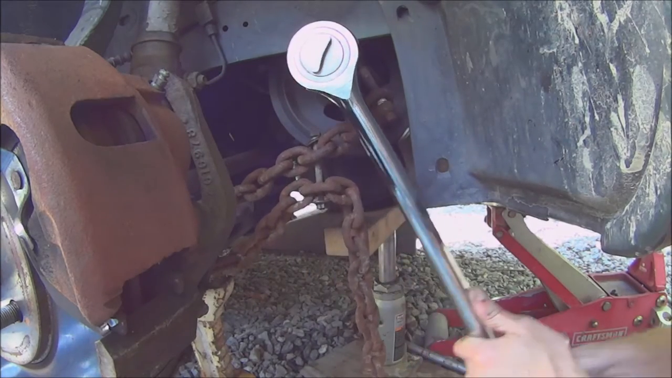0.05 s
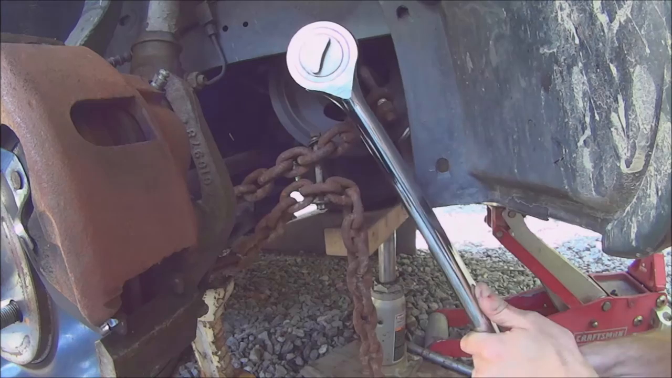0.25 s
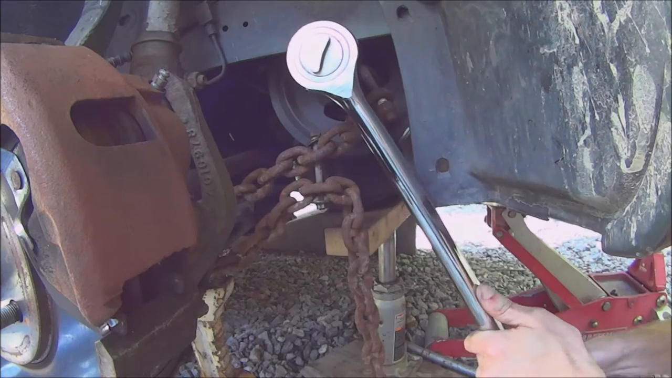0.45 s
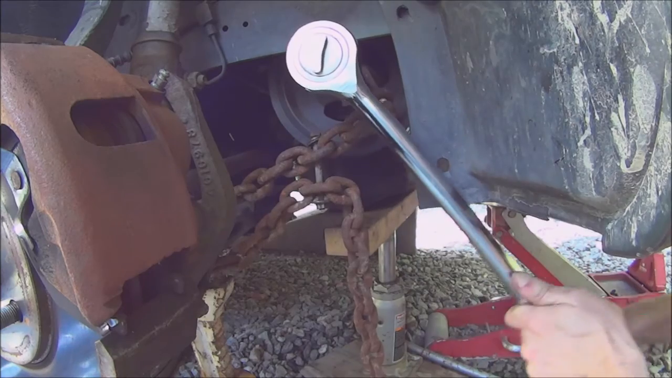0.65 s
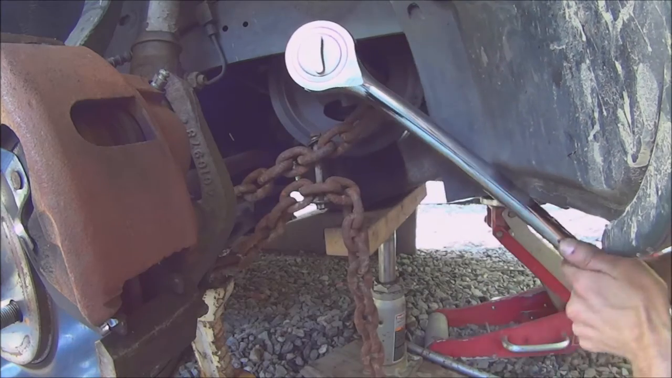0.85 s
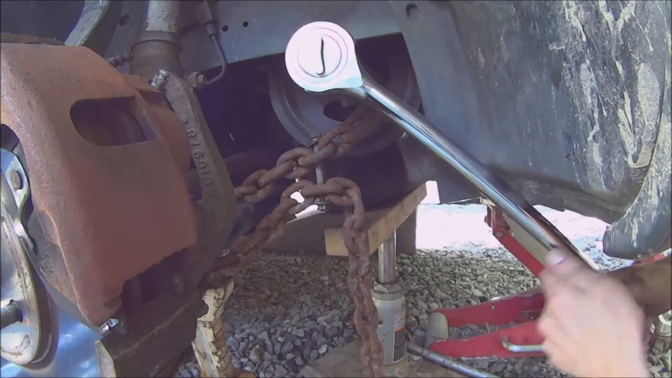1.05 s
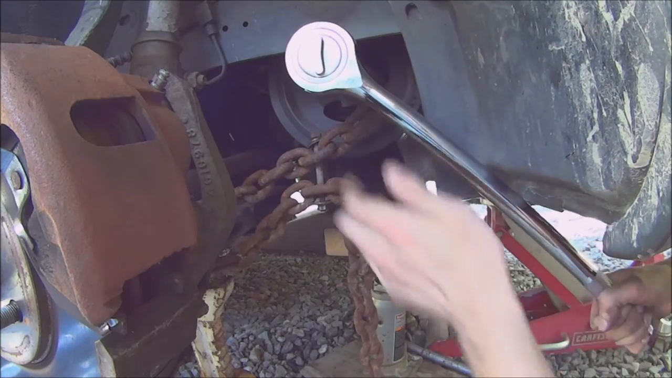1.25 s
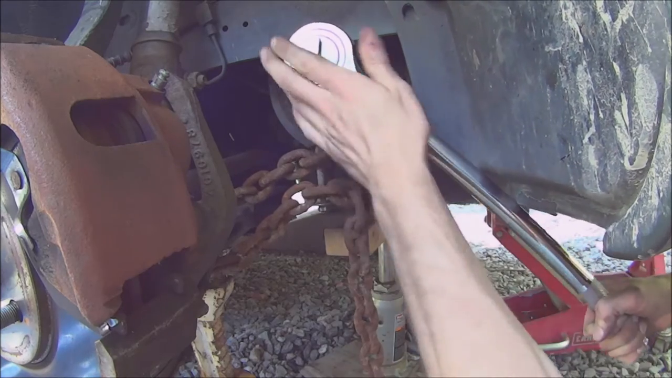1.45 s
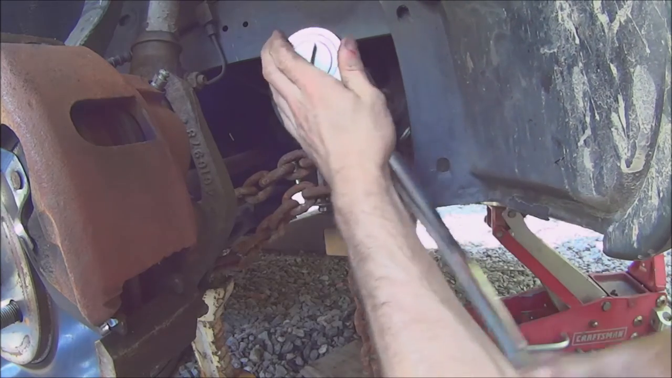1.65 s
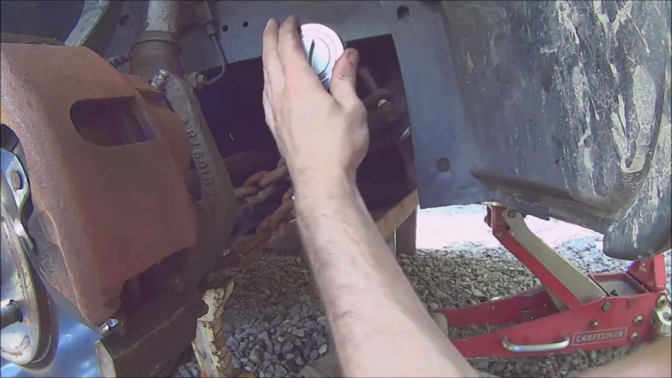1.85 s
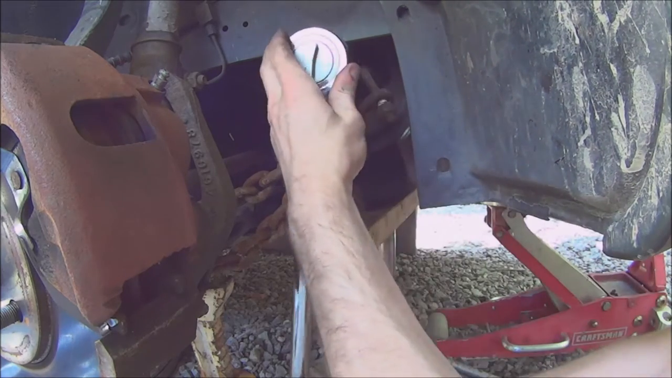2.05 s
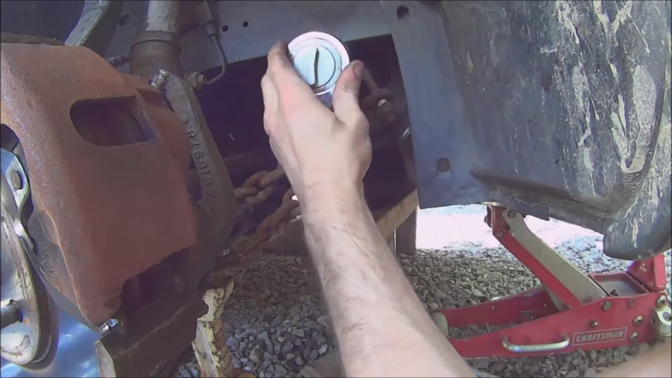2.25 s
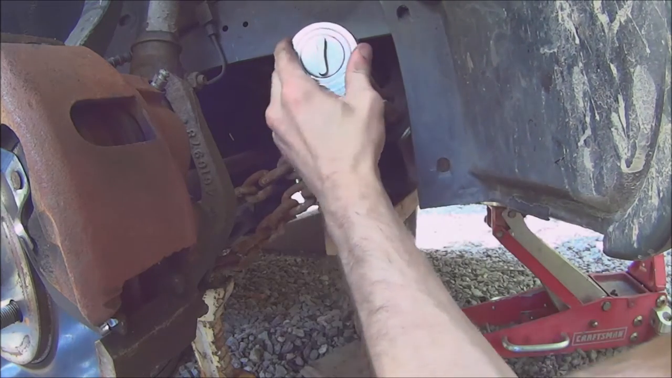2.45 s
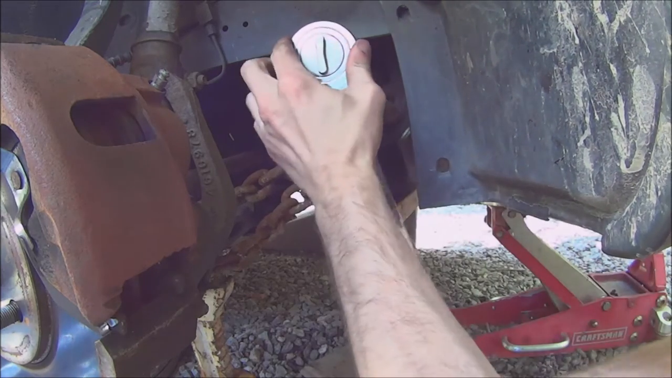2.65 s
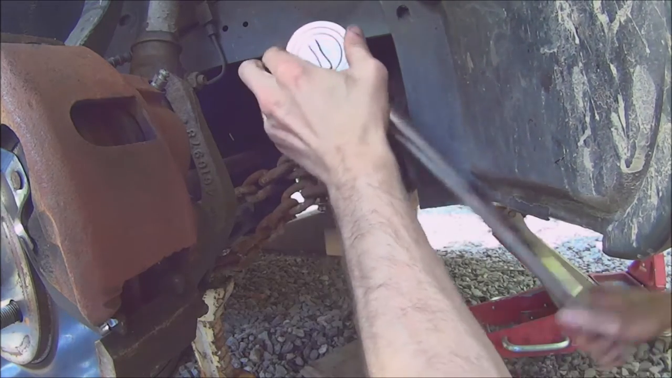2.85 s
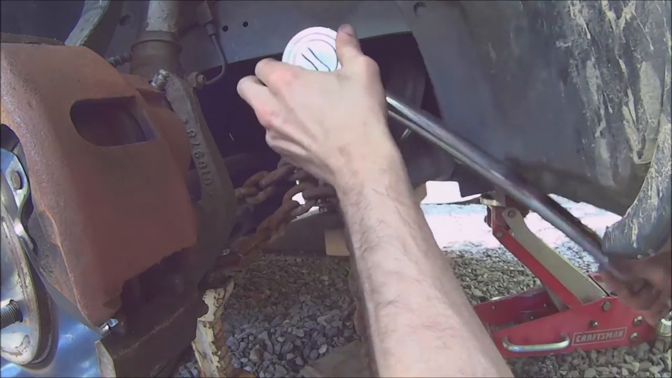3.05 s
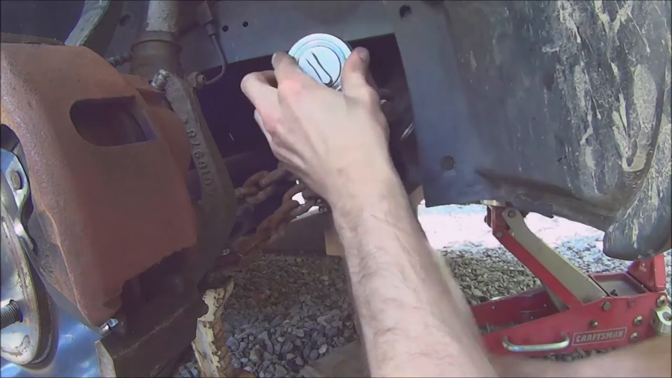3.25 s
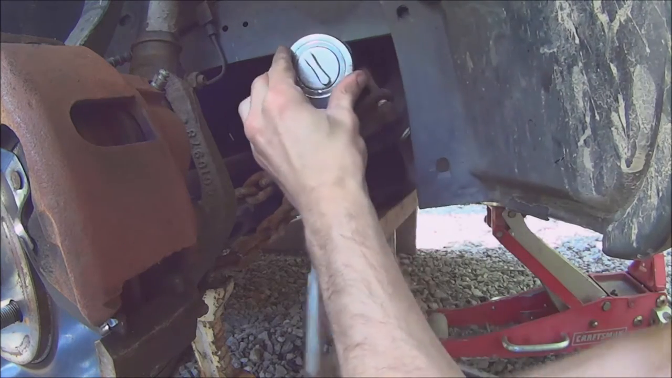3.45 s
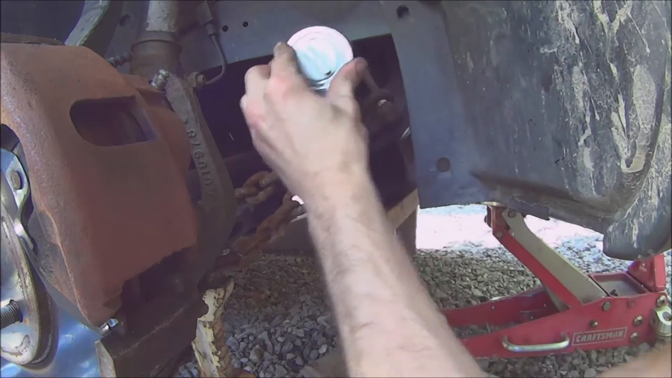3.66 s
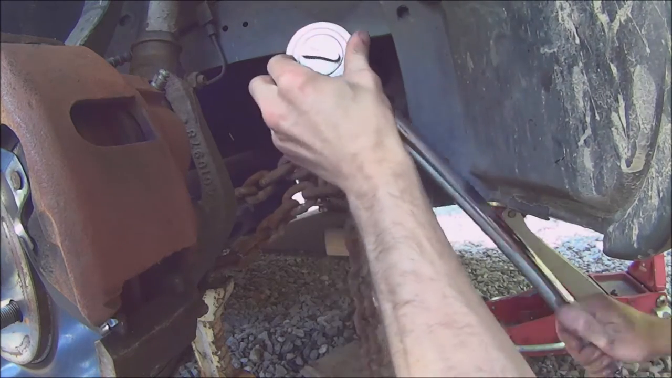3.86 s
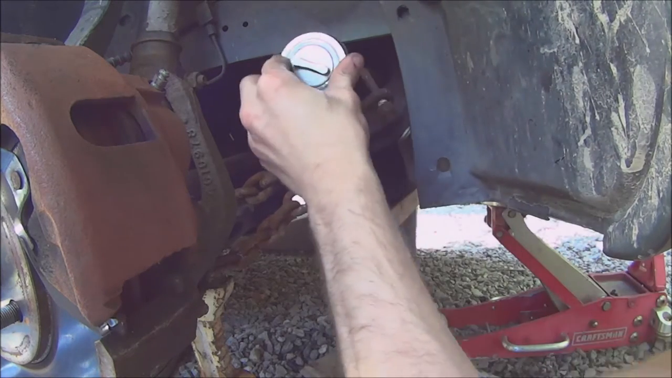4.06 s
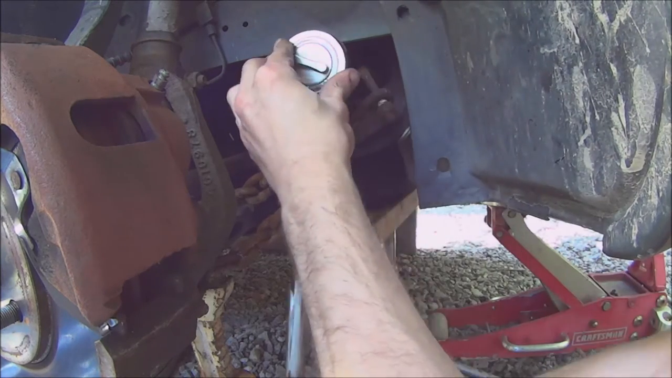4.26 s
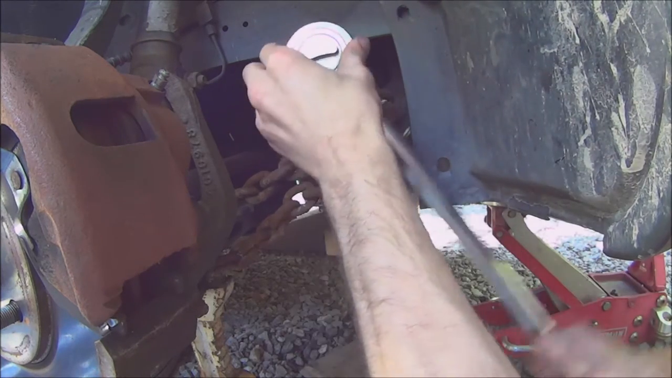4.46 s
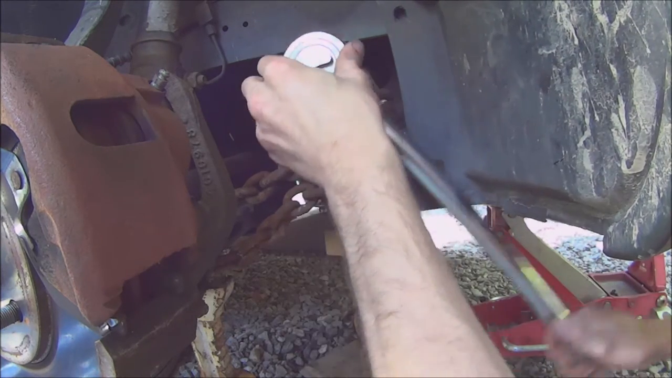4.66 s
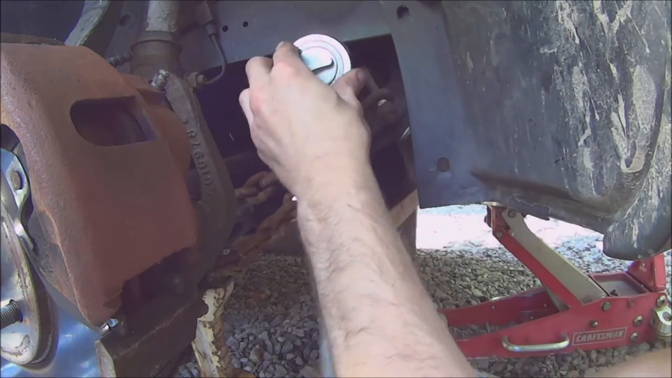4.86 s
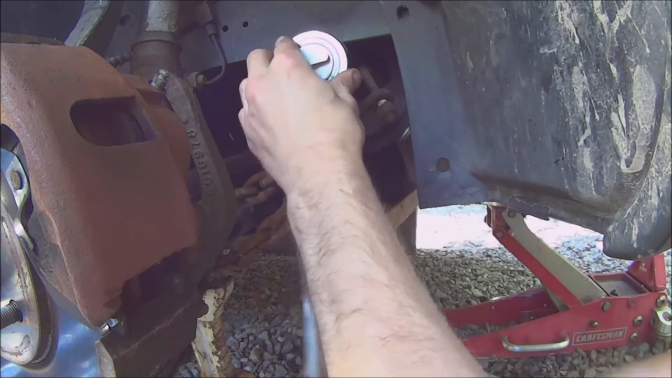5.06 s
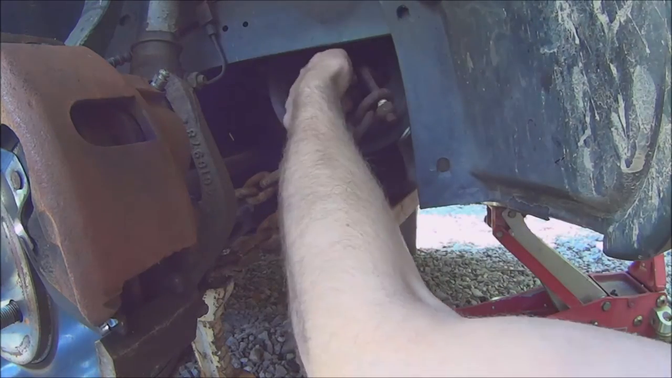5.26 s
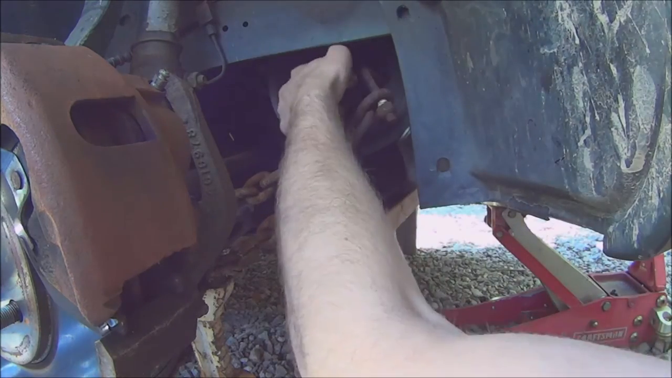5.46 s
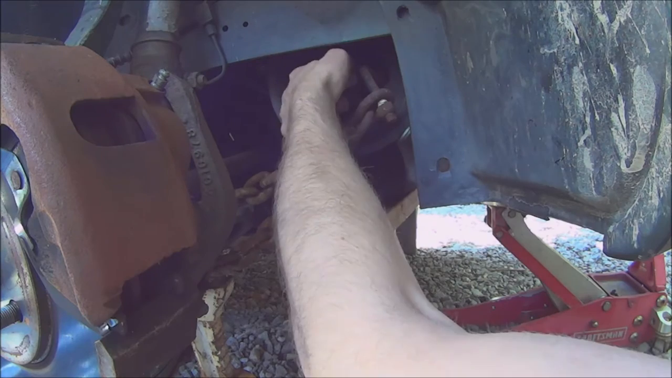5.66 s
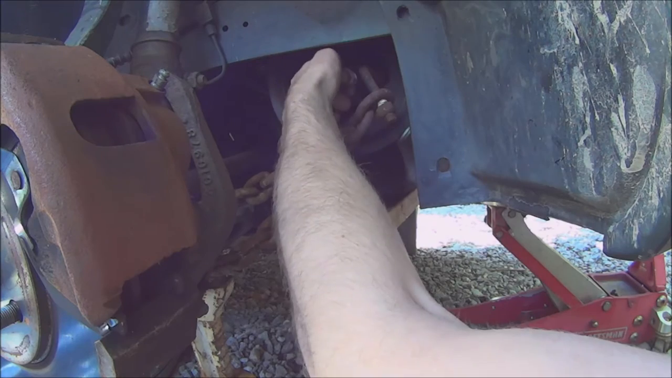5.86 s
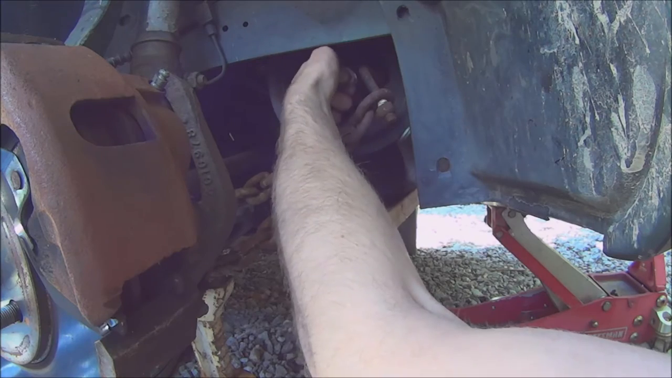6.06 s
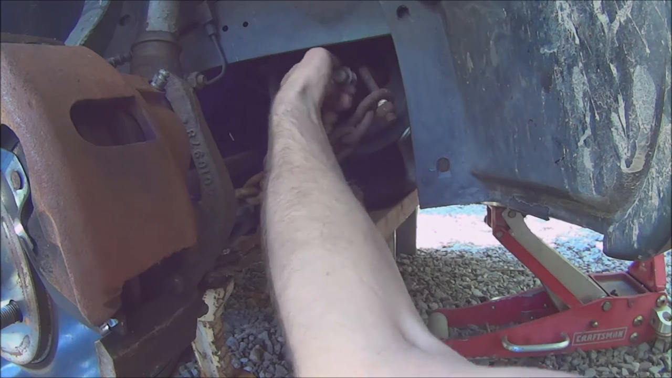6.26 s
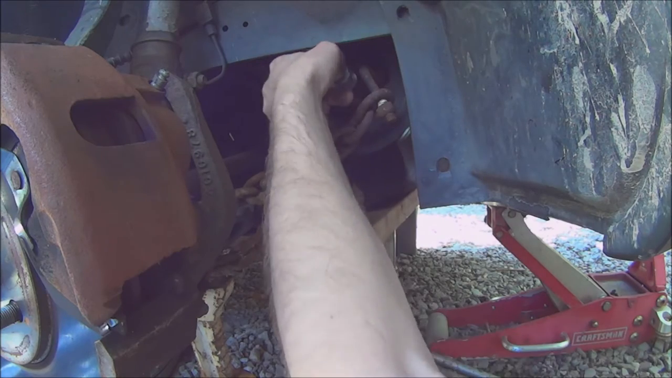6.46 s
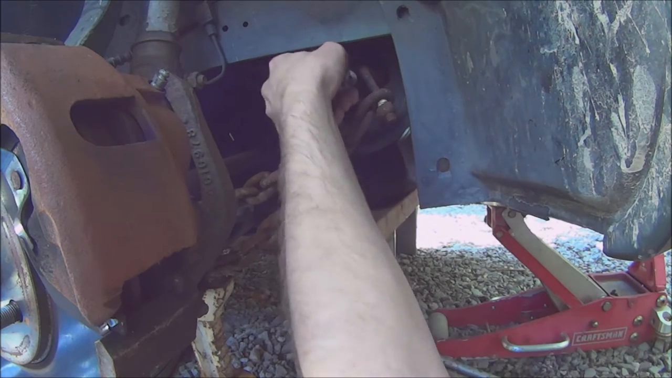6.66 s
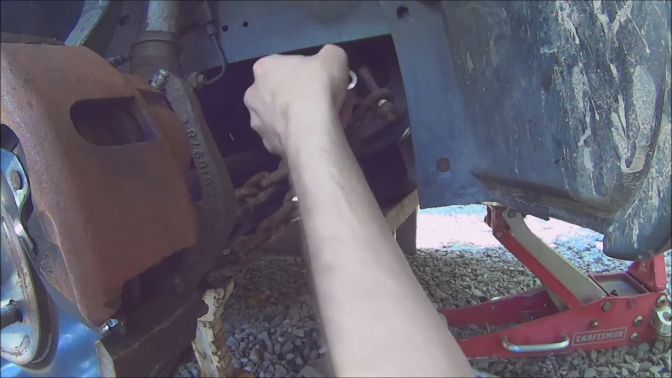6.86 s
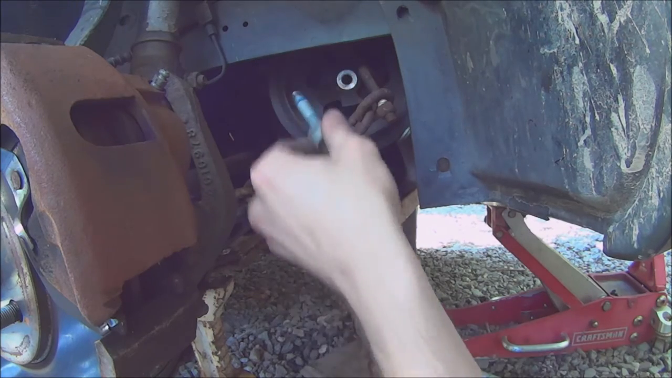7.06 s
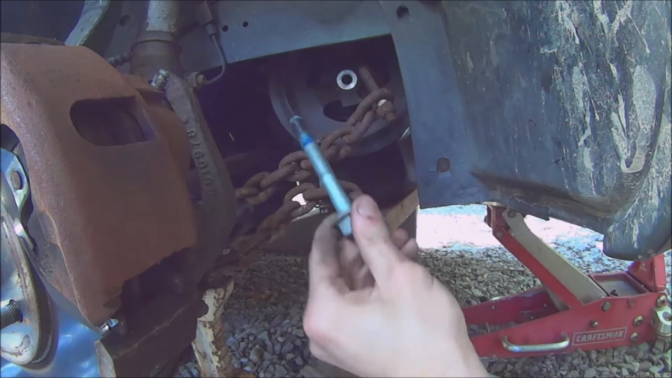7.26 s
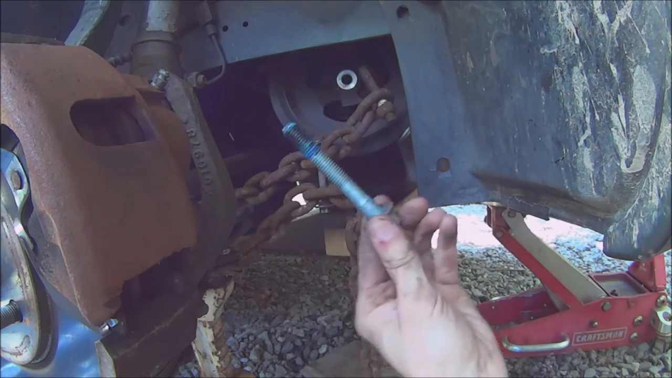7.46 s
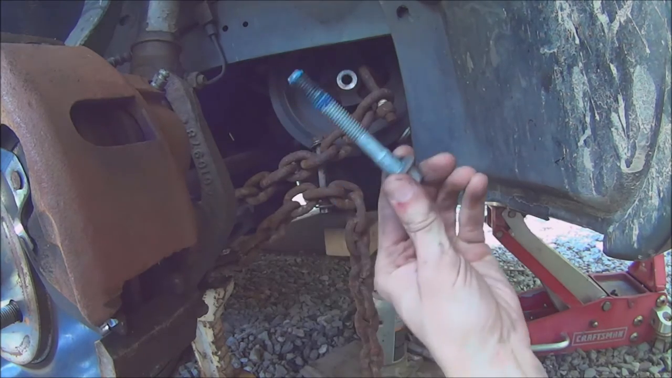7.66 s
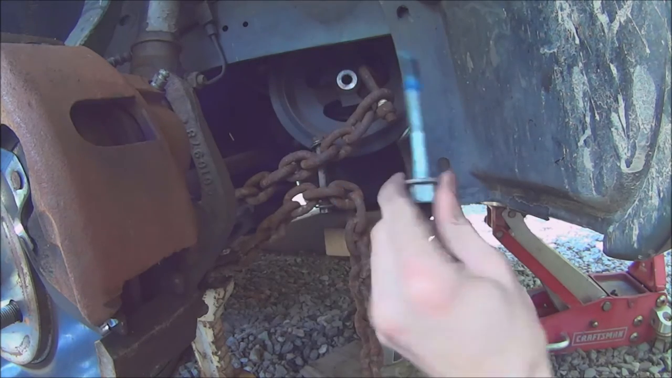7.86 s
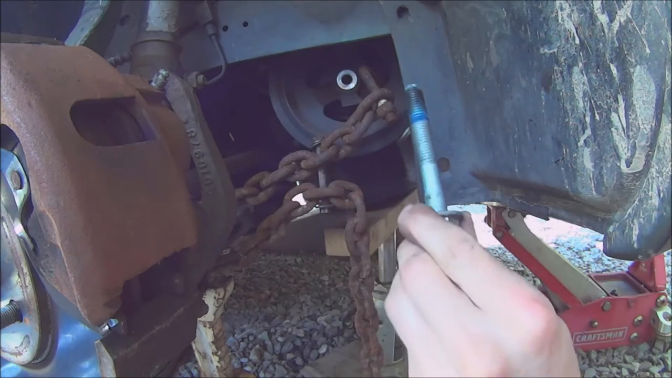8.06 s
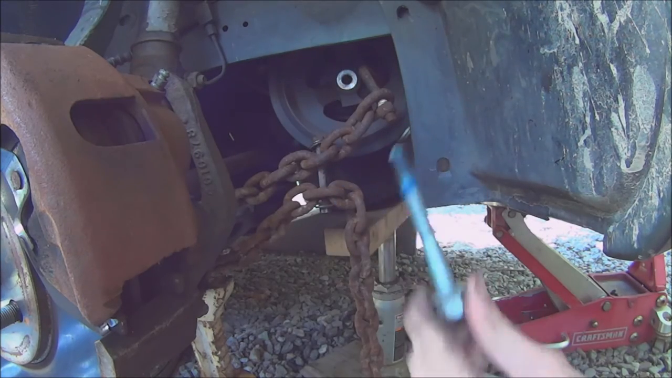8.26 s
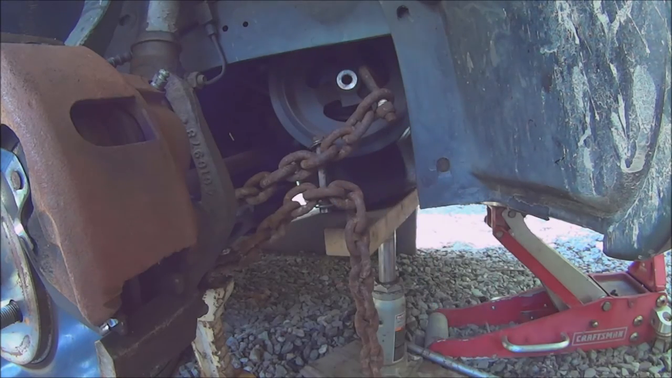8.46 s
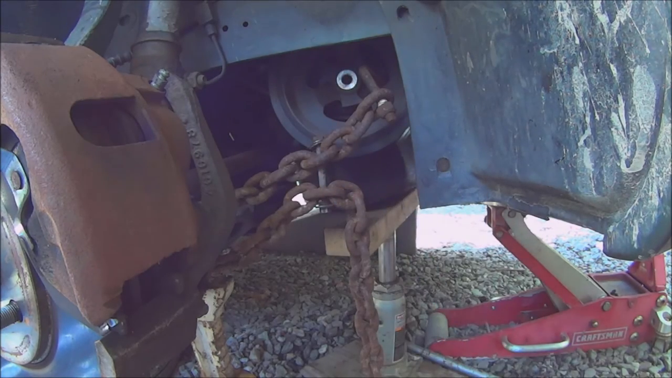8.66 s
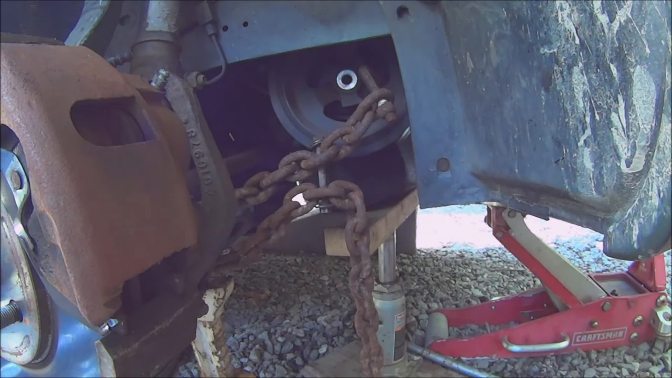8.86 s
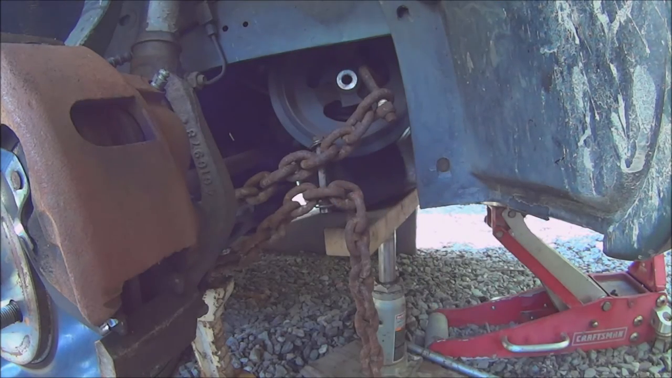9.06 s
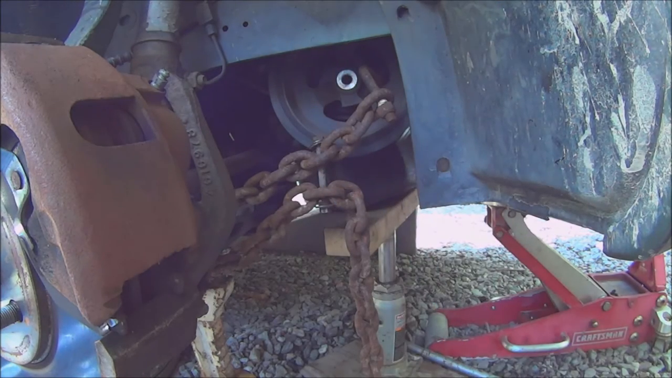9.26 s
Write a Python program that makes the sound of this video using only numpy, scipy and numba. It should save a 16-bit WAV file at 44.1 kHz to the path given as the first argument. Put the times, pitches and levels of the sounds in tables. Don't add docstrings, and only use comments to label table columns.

```python
import sys
import numpy as np
from scipy import signal
from scipy.fft import rfft, irfft, next_fast_len
from scipy.io import wavfile
from scipy.ndimage import uniform_filter1d
from numba import njit

SR = 44100
rng = np.random.default_rng(int(sys.argv[2]) if len(sys.argv) > 2 else 0)


def voltage_ratio(decibels):
    exponent = np.asarray(decibels, float) / 20
    return 10 ** exponent


def to_wav(sig):
    pcm = np.clip(np.atleast_2d(sig), -1, 1) * 32767
    pcm = np.round(pcm).astype(np.int16)
    wavfile.write(sys.argv[1], SR, pcm.T)


N = 410571
TIME = np.arange(N) / SR
SIDES = np.array([[1], [-1]])

# start_s, end_s
MOMENTS = [
    (0, 5.159),
    (5.192, 9.132),
    (9.158, 9.4),
]
TOP_HZ = 11050

# time_s, level_db
ENGINE_LOAD = [(0, -44.5), (.6, -43), (1.6, -42.5), (1.85, -46.5), (2.1, -42), (2.85, -39), (3.3, -52.5),
               (3.8, -46.5), (4.2, -44.5), (4.7, -50), (4.95, -47), (5.16, -37)]
FIRING_HZ, SLOWER_HZ = 78.44, 73.2
SLOWER_PEAK_S, SLOWER_DB, SLOWER_DB_PER_S = 2.8, -44.5, 10.5
# time_s, rise_db
LABOURS = [
    (4.25, 8),
    (5.05, 12),
]
SECOND_DB, LABOUR_S = -59.5, 0.24
# freq_hz, density_db (dB per Hz)
RUMBLE_COLOUR = [(53, -32.5), (90, 0.5), (108, -11.5), (151, -11), (219, -18), (311, -23.5), (363, -12),
                 (471, -17.5), (1060, -22.5), (1270, -21.5), (3500, -40), (4550, -64.5), (7700, -120)]
# freq_hz, density_db (dB per Hz)
HISS_COLOUR = [(1470, -3), (2500, -1.5), (2950, -8), (6510, -9.5), (9870, -16), (11100, -17), (11500, -47),
               (15000, -75), (22000, -120)]
RUMBLE_DB, HISS_DB, RUMBLE_DB_PER_S, HISS_DB_PER_S = -47.5, -59.5, 0.45, 1.21
# freq_hz, density_db (dB per Hz)
DRONE_COLOUR = [(12, -59), (20, -33.5), (32, -23), (41, -8), (59, -4.5), (75, 0.5), (110, -23), (140, -44),
                (240, -120)]

# time_s, peak_db
FIRST_BLOW = [
    (.009, -12.5),
]
# freq_hz, level_db, t60_s
SOCKET_MODES = [(1126, -4, 0.11), (1720, -17, 0.086), (2128, 7, 0.12), (2460, -2, 0.092), (2950, -8, 0.1),
                (3490, 4.5, 0.032), (4800, -14, .08), (6200, -25, .08), (7330, -4, 0.034)]
# time_s, peak_db, brightness_db (per octave)
SLIPS = [(0.023, -18.5, 6), (0.753, -15, 3), (0.774, -15, -9.5), (0.796, -17, 1), (0.843, -29, -12),
         (0.904, -39, 10), (1.032, -22.5, 1), (2.869, -11, 1.5), (2.888, -10, 10), (2.901, -10.5, -6),
         (2.919, -8, 1), (3.027, -15.5, -4.5), (3.076, -28, -2), (3.104, -28.5, 9), (3.14, -17, -2),
         (3.165, -26.5, 3), (3.214, -26.5, 0), (3.987, -26.5, 16), (4.33, -28, 14), (4.502, -16.5, 2),
         (4.519, -7.5, 6), (4.534, -9.5, 1.5), (4.553, -10.5, -4.5), (4.619, -20, -1), (4.636, -22.5, 6.5),
         (4.699, -20.5, 1.5), (5.117, -26, 6.5)]
# time_s, peak_db, brightness_db (per octave)
SET_DOWN = [
    (8.533, -38, -6),
]
# freq_hz, level_db, t60_s
FRAME_MODES = [(100, -12.5, 0.05), (157, -15.5, .05), (221.3, -6, 0.12), (280, -32, .05), (346, 3.5, 0.068),
               (421, 13, 0.024), (517, 1, .04), (624, -0.5, 0.09), (780, -4, 0.017), (1060, 0.5, 0.02),
               (1436, -19.5, 0.019), (1884, -28, .012)]
SLIP_T60_S = 0.1

# time_s, from_hz, to_hz, level_db
BIRD_NOTES = [(0.058, 3940, 3860, -56), (0.137, 3890, 3890, -73), (0.424, 3800, 3880, -59),
              (5.2, 2650, 3410, -67.5), (5.442, 5700, 6230, -56.5), (5.48, 5150, 5480, -57),
              (5.513, 6000, 5950, -61.5), (5.502, 2950, 2950, -71), (6.23, 3930, 5500, -52),
              (6.275, 5370, 4500, -55.5), (6.326, 2970, 2840, -63), (6.362, 3340, 4280, -51.5),
              (6.385, 3990, 3630, -72), (6.967, 1647, 1700, -70.5), (7.342, 3910, 3760, -55.5),
              (7.385, 3840, 5580, -57.5), (7.431, 5840, 6000, -56.5), (7.474, 5760, 4970, -57.5),
              (7.505, 3280, 4470, -55.5), (8.045, 2825, 2990, -56), (8.08, 2866, 1800, -60),
              (8.205, 2473, 2784, -57), (8.28, 2350, 2150, -66), (8.64, 5440, 5820, -61),
              (8.675, 5240, 3670, -59), (8.81, 3970, 3570, -62)]
NOTE_CYCLES = 190

# time_s, peak_db
SNAPS = [
    (0.7492, -38),
    (2.8609, -24),
    (3.6799, -45),
    (4.7207, -41.5),
    (5.1537, -19.5),
]

# time_s, peak_db, handle_ring_db (re peak), head_ring_db (re peak)
TEETH = [(1.7121, -10, -12.5, -21), (1.7819, -6.5, -22, -21), (1.852, -10, -25.5, -10),
         (1.942, -13.5, -13, -8), (3.2215, -12, -12.5, -11), (3.2609, -22, -1, 3.5),
         (3.307, -12.5, -10, -7.5), (3.3495, -13.5, -8, -8.5), (3.3994, -18, -6, -5.5),
         (3.4729, -15, -12, -4.5), (3.9997, -8.5, -21.5, -22), (4.0514, -12.5, -7, -9),
         (4.0897, -15.5, -18, -10.5), (4.1313, -19.5, -11.5, -4.5), (4.1794, -25.5, -3.5, 8),
         (4.7217, -16.5, -11, -2), (4.7596, -14, -14, -2.5), (4.7957, -14.5, -21, -8),
         (4.8364, -17, -10, -4.5), (4.8806, -15.5, -11.5, -9.5)]
RATCHET_HZ = [2126, 3510, 3950, 4500, 5200, 5840, 6795, 6985, 7526, 8395, 8870, 9500, 10345, 10930]
# level_db, t60_s
RATCHET_MODES = [(-18.5, 0.43), (-6.5, 0.11), (-15.5, 0.075), (-9, 0.08), (-5.5, 0.102), (-47.5, 0.3),
                 (-11, 0.12), (-4, 0.085), (-31.5, 0.053), (-0.5, 0.13), (-16.5, 0.16), (-18.5, 0.11),
                 (-1.5, 0.15), (-6.5, 0.16)]
RATCHET_PART = [0, 0, 0, 0, 0, 1, 1, 1, 1, 2, 2, 2, 3, 3]
HEAD_MID_DB, HEAD_HIGH_DB = -7.5, -9.5
TOOTH_SCATTER_DB = 4
# time_s, peak_db, centre_hz
TICKS = [(0.7501, -10.5, 4350), (1.5789, -18.5, 3140), (1.652, -24, 4000), (1.6677, -20.5, 3600),
         (1.831, -33, 6890), (2.3183, -13, 4020), (2.3287, -15, 3630), (2.8633, -8, 4500),
         (2.8747, -14, 2860), (2.8844, -12, 3770), (2.9188, -15.5, 2820), (3.025, -21.5, 2580),
         (3.197, -26, 6910), (3.3915, -13, 5250), (3.4605, -21.5, 6970), (3.567, -18, 5500),
         (3.6376, -9, 6100), (3.68, -11.5, 4700), (3.9815, -15.5, 4200), (4.3282, -22.5, 5700),
         (4.5, -11, 4000), (4.532, -28, 2420), (4.5423, -13, 2960), (4.6686, -24.5, 6660),
         (4.7086, -26, 6650), (5.1487, -15.5, 4870)]
# time_s, peak_db
PLAY = [(0.776, -23), (0.7957, -24.5), (1.4286, -26.5), (1.615, -28), (1.6396, -22.5), (1.6846, -30),
        (2.185, -26.5), (2.218, -24), (2.2405, -35), (2.2715, -28.5), (3.1055, -24.5), (3.1463, -25),
        (3.1608, -21.5), (3.5957, -26), (3.608, -24), (3.699, -23.5), (4.2898, -25.5), (4.372, -22),
        (4.4173, -28), (4.5235, -29), (4.594, -23.5), (4.6349, -31.5), (4.951, -32), (5.017, -31),
        (5.047, -28), (5.074, -19.5), (5.135, -28.5), (5.1546, -26)]
PLAY_HZ, TICK_T60_S, PLAY_T60_S = 3600, .042, 0.071

# freq_hz, density_db (dB per Hz)
YARD_COLOUR = [(59, -45), (100, -5.5), (155, -0.5), (275, -11), (310, -9), (393, -10.5), (788, -13),
               (981, -16.5), (2090, -15.5), (9620, -25), (11500, -24), (15000, -67), (22000, -120)]
# time_s, level_db
YARD_LEVEL = [
    (5.19, -62.5),
    (8.17, -64.5),
    (9.13, -61.5),
]
DRONE_DB = -66.5
# time_s, level_db
RUSTLE = [
    (8.5, -69),
    (8.62, -60.5),
    (8.9, -56.5),
    (9.13, -58.5),
]
# time_s, level_db
SCRAPE = [
    (8.532, -88),
    (8.538, -58),
    (8.6, -52),
    (8.655, -58.5),
    (8.675, -80),
]

# time_s, peak_db, shank_ring_db (re peak)
TURNS = [(5.7169, -36, -34), (5.7394, -52.5, -34), (6.0706, -26.5, -25.5), (6.1344, -35.5, -18.5),
         (6.1694, -43.5, -12), (6.3699, -32, -20), (6.3794, -33.5, -4.5), (6.4094, -37.5, -4),
         (6.4394, -48, -22), (6.5894, -41, -16.5), (6.6084, -34, -18), (6.6223, -31.5, -4),
         (6.6588, -36, -4), (6.7351, -40, -8), (6.7491, -31.5, -3), (9.1686, -46.5, -29)]
# freq_hz, level_db, t60_s
SHANK_MODES = [(3876, 0, 0.16)]
# freq_hz, level_db, t60_s
WASHER_MODES = [(10700, 0, 0.11)]
# freq_hz, level_db, t60_s
BORE_MODES = [(406, -11, .03), (602, 4.5, 0.042), (950, -11, 0.016), (1330, -1.5, 0.035),
              (1460, -5.5, 0.032), (1800, 1, 0.017), (2230, -2, 0.038), (2370, -6, 0.039)]
USUAL_TURN_DB, WASHER_DB, KNOCK_DB = -38.5, -57, -46
FOLLOW = 0.46

# freq_hz, density_db (dB per Hz)
AIR_COLOUR = [(12, -73), (20, -39), (187, -14.5), (285, -4), (367, -23), (574, -13), (3950, -23),
              (12400, -22.5), (16000, -28.5)]
AIR_DB = -59


def curve(table):
    s, *columns = np.transpose(table)
    return [np.interp(TIME, s, c) for c in columns]


def noise(spectrum, width, flicker_db, rate):
    size = next_fast_len(N)
    hz = np.fft.rfftfreq(size, 1 / SR) + 1
    f, db = np.transpose(spectrum)
    colour = voltage_ratio(np.interp(np.log(hz), np.log(f), db))
    shape = colour * np.array([hz > 0, width * np.minimum(hz / 300, 1)])
    mid, side = irfft(rfft(rng.standard_normal((2, size))) * shape, size)[:, :N]
    hold = int(SR / rate)
    steps = np.repeat(rng.standard_normal(N // hold + 1), hold)[:N]
    walk = uniform_filter1d(steps, hold)
    return voltage_ratio(flicker_db * walk) * (mid + SIDES * side) / mid.std()


def add(out, s, sound, db):
    i = int(s * SR)
    out[:, i:i + sound.shape[1]] += voltage_ratio(db) * sound[:, :N - i]


def decay(t60, length=0.18):
    t = np.arange(int(length * SR)) / SR
    return np.exp(-np.log(1000) * t / np.maximum(t60, .003)) + 1e-9


def peak(x):
    return x / np.abs(x).max()


@njit
def resonate(contact, poles, left, right):
    out, z = np.zeros((2, len(contact))), np.empty(len(contact), np.complex128)
    for k in range(len(poles)):
        state, top = 0j, 0.
        for i in range(len(contact)):
            state = state * poles[k] + contact[i]
            z[i], top = state, max(top, state.real ** 2 + state.imag ** 2)
        for i in range(len(contact)):
            out[0, i] += (z[i] * left[k]).imag / np.sqrt(top)
            out[1, i] += (z[i] * right[k]).imag / np.sqrt(top)
    return out


def ring(modes, chatter_s, scatter_db, lead, pan_db):
    hz, db, t60 = np.transpose(modes)
    level_chance, pitch_chance, phase_chance = rng.standard_normal((len(modes), 3)).T
    contact = decay(chatter_s) * rng.standard_normal(len(decay(1))) ** 3 + 1e-12
    swing = 2j * np.pi * hz * (1 + 0.0022 * pitch_chance)
    poles = np.exp((swing - np.log(1000) / np.maximum(t60, .003)) / SR)
    size = voltage_ratio(db + scatter_db * level_chance)
    turn = np.exp(.5j * lead * (1 + 0.29 * phase_chance))
    return resonate(contact, poles, size * turn, size / turn) * voltage_ratio(SIDES * pan_db / 2)


def crack(hz, width, t60, pan_db):
    length = .12
    envelope = decay(t60, length) + 0.82 * decay(0.0033, length)
    mid, side = rng.standard_normal((2, len(envelope))) * envelope
    b, a = signal.iirpeak(min(hz, 15000), 1 / width, SR)
    low_cut = signal.butter(2, 0.29 * hz, "high", fs=SR)
    body = signal.lfilter(b, a, mid + 0.33 * SIDES * side)
    return peak(signal.lfilter(*low_cut, body)) * voltage_ratio(SIDES * pan_db / 2)


def engine():
    firing_db = curve(ENGINE_LOAD)[0]
    slower_db = SLOWER_DB - SLOWER_DB_PER_S * abs(TIME - SLOWER_PEAK_S)
    second_db = SECOND_DB + sum(db * np.exp(-((TIME - s) / LABOUR_S) ** 2) for s, db in LABOURS)
    turn = 2 * np.pi * TIME
    lines = voltage_ratio(firing_db) * np.sin(FIRING_HZ * turn)
    lines = lines + voltage_ratio(second_db) * np.sin(2 * FIRING_HZ * turn)
    lines = lines + voltage_ratio(slower_db) * np.sin(SLOWER_HZ * turn + 1.2)
    rumble = voltage_ratio(RUMBLE_DB + RUMBLE_DB_PER_S * TIME) * noise(RUMBLE_COLOUR, 0.67, 3.3, 10)
    traffic = voltage_ratio(-51.0) * noise(DRONE_COLOUR, .9, .6, 2.6)
    hiss = voltage_ratio(HISS_DB + HISS_DB_PER_S * TIME) * noise(HISS_COLOUR, 0.6, 0.59, 2.6)
    return np.sqrt(2) * lines * voltage_ratio(SIDES * -.5) + rumble + traffic + hiss


def frame():
    out = np.zeros((2, N))
    for s, db, bright_db in SLIPS + SET_DOWN:
        modes = [(hz, d + bright_db * np.log2(hz / 335), t) for hz, d, t in FRAME_MODES]
        add(out, max(s - .004, 0), peak(ring(modes, SLIP_T60_S, 3.8, 0.76, -6.0)), db)
        add(out, s, crack(1500, 0.42, SLIP_T60_S, -2.5), db - 16.0 + 1.1 * bright_db)
    for s, db in FIRST_BLOW:
        add(out, s, peak(ring(SOCKET_MODES, 0.18, 0, 0.8, -2.5)), db - 1.0)
        add(out, s, crack(2800, 1.8, 0.13, -2.2), db + 1.5)
    return out


def birds():
    direct = np.zeros((2, N))
    for s, from_hz, to_hz, db in BIRD_NOTES:
        length = 2 * NOTE_CYCLES / (from_hz + to_hz)
        u = np.linspace(0, 1, int(length * SR))
        unsteady_throat = uniform_filter1d(rng.standard_normal(len(u)), size=200)
        warble = (300 + 0.58 * abs(to_hz - from_hz)) * unsteady_throat
        pitch_hz = from_hz + (to_hz - from_hz) * u + warble
        tone = np.sin(2 * np.pi * np.cumsum(pitch_hz) / SR) * np.sin(np.pi * u) ** 0.21
        add(direct, s, np.array([tone, tone]), db)
    mid, side = rng.standard_normal((2, SR)) * decay(0.48, length=1)
    echoes = (mid + 0.42 * SIDES * side) / np.sqrt(np.sum(mid ** 2))
    echoed = signal.fftconvolve(direct, echoes, axes=1)[:, :N]
    return (voltage_ratio(-6) * direct + voltage_ratio(5.5) * echoed) * voltage_ratio(SIDES * -1.5)


def snaps():
    out = np.zeros((2, N))
    for s, db in SNAPS:
        add(out, s - .001, crack(13000, .6, 0.0051, 1.5), db)
    only_top = signal.butter(8, TOP_HZ, "high", fs=SR, output="sos")
    return signal.sosfilt(only_top, out + 1e-12 * rng.standard_normal(N))


def ratchet():
    out = np.zeros((2, N))
    for s, db, handle_db, head_db in TEETH:
        part_db = handle_db, head_db, head_db + HEAD_MID_DB, head_db + HEAD_HIGH_DB
        modes = [(hz, d + part_db[part], t60)
                 for hz, part, (d, t60) in zip(RATCHET_HZ, RATCHET_PART, RATCHET_MODES)]
        twins = [(hz + 45, d - 7, .7 * t60) for hz, d, t60 in modes]
        add(out, s - .0048, crack(5080, 1.0, 0.027, -1.55), db - 15.5)
        add(out, s - .001, crack(5500, 0.81, 0.094, -1.5), db - 4.5)
        add(out, s - .001, ring(modes + twins, 0.047, TOOTH_SCATTER_DB, 0.78, -2.7), db - 0.5)
    ticks = [(*t, TICK_T60_S) for t in TICKS]
    play = [(*p, PLAY_HZ, PLAY_T60_S) for p in PLAY]
    for s, db, hz, t60 in ticks + play:
        seat = crack(hz, 0.27, t60, -1.5)
        splash = voltage_ratio(-5.0) * crack(5700, 3.1, 0.68 * t60, -1.3)
        add(out, s - .001, seat + splash, db - 4.5)
    return out


def yard():
    # (Hz, dB per Hz)
    grit = [(100, -39), (250, 4), (900, -7.0), (3500, -6.0), (7000, -14.5), (11000, -22)]
    plate = [(120, -30), (230, 0.5), (700, -7), (1100, -9.0), (2250, -0.5), (2500, -29)]
    rustle = voltage_ratio(curve(RUSTLE)[0] - 2) * noise(grit, 0.65, 4.7, 51) * (TIME > RUSTLE[0][0])
    sliding = (TIME > SCRAPE[0][0]) * (TIME < SCRAPE[-1][0])
    scrape = voltage_ratio(curve(SCRAPE)[0]) * noise(plate, 0.56, 3.85, 90) * sliding
    still_air = voltage_ratio(curve(YARD_LEVEL)[0]) * noise(YARD_COLOUR, 0.92, 0.26, 16)
    traffic = voltage_ratio(DRONE_DB) * noise(DRONE_COLOUR, 0.27, 0.92, 3)
    return still_air + traffic + rustle + scrape


def bolt():
    out = np.zeros((2, N))
    for s, db, shank_db in TURNS:
        harder_db = FOLLOW * (db - USUAL_TURN_DB)
        start = s - .001
        add(out, start, crack(4500, 1.2, 0.026, -1.5), db - 12.0)
        add(out, start, ring(SHANK_MODES, 0.0021, 0, 0.33, -1.4), db + shank_db)
        add(out, start, ring(WASHER_MODES, 0.06, 0, 0.49, -1.5), WASHER_DB + harder_db)
        add(out, start, peak(ring(BORE_MODES, 0.24, 2.8, 0.6, -1.9)), KNOCK_DB + harder_db)
        add(out, start, crack(1240, 2.0, 0.076, -1.3), KNOCK_DB + harder_db - 3.0)
    return out


def scene():
    first, second, third = (uniform_filter1d(1. * (TIME >= a) * (TIME < b), size=40) for a, b in MOMENTS)
    hits = ratchet() + frame() + bolt() + birds()
    close = (hits + engine()) * first + (hits + yard()) * second
    close = np.tanh(2 * close) / 2
    narrow = signal.sosfilt(signal.ellip(10, .3, 70, TOP_HZ, fs=SR, output="sos"), close)
    air = voltage_ratio(AIR_DB) * noise(AIR_COLOUR, 0.71, 3.9, 6.693)
    gap_air = voltage_ratio(-22.5) * air * (TIME > MOMENTS[0][1]) * (1 - second)
    return narrow + snaps() + (air + hits) * third + gap_air


def low_pass(x):
    return signal.sosfilt(signal.butter(12, 16650, fs=SR, output="sos"), x)


def record(dry):
    port = signal.sosfilt(signal.butter(2, 45, "high", fs=SR, output="sos"), dry)
    return low_pass(port)


dry = scene()
out = record(dry)
to_wav(out)
```